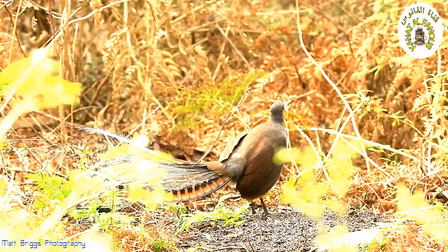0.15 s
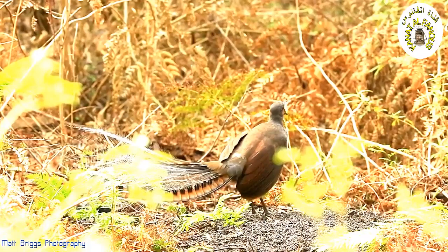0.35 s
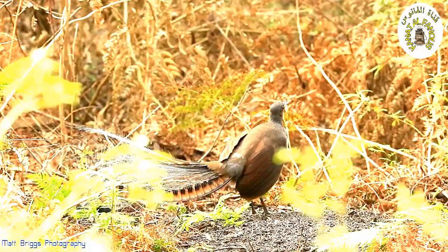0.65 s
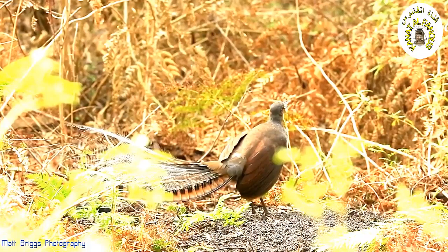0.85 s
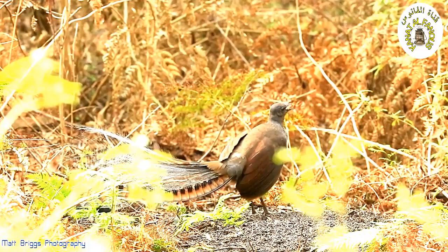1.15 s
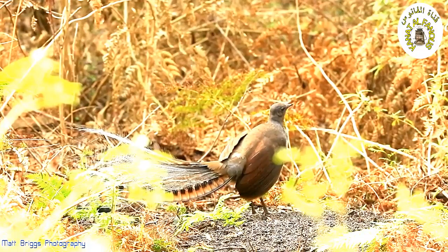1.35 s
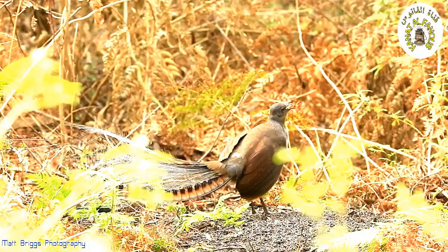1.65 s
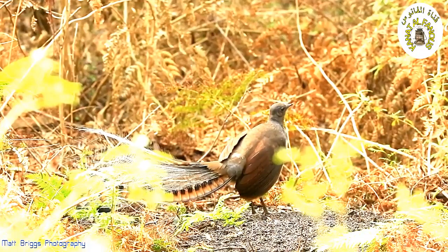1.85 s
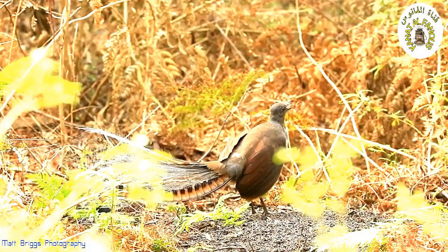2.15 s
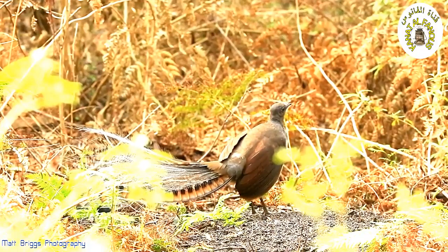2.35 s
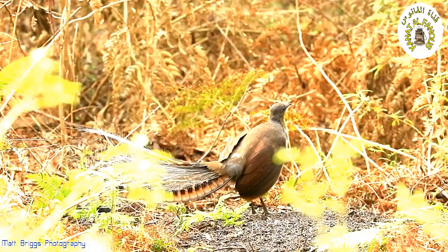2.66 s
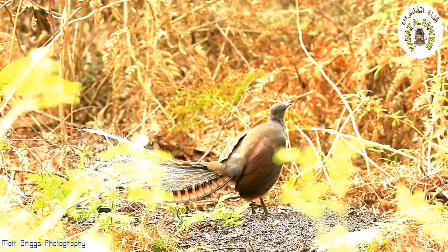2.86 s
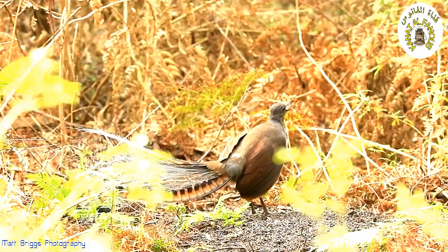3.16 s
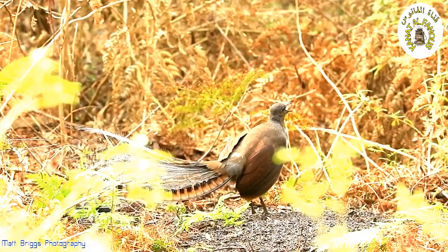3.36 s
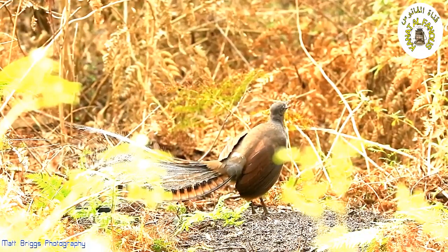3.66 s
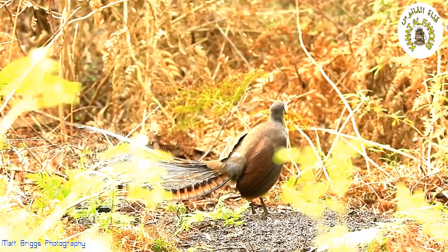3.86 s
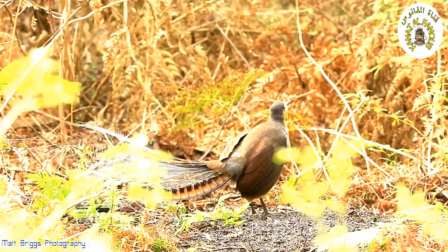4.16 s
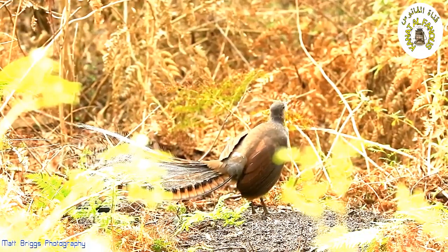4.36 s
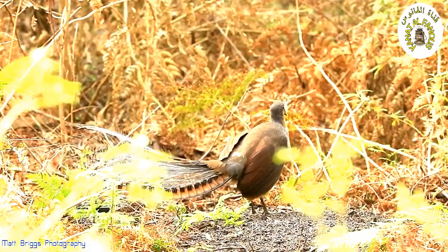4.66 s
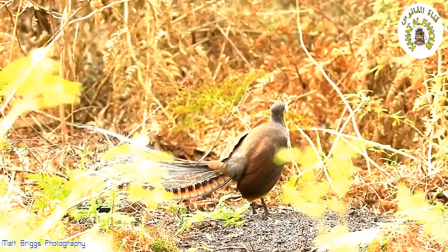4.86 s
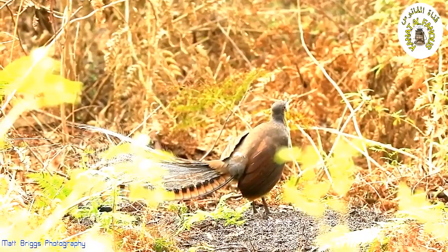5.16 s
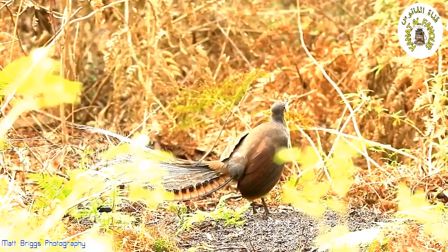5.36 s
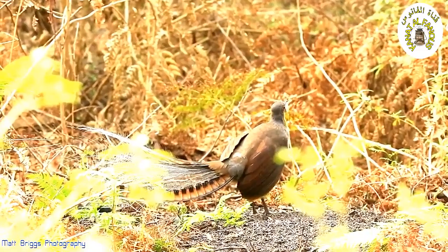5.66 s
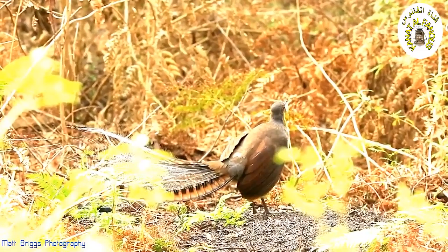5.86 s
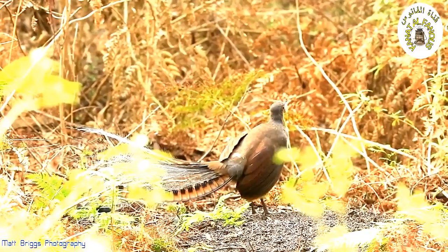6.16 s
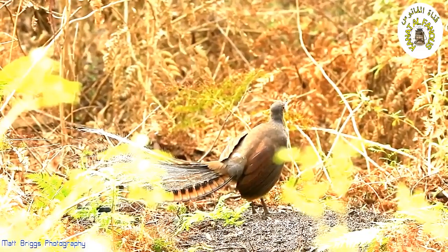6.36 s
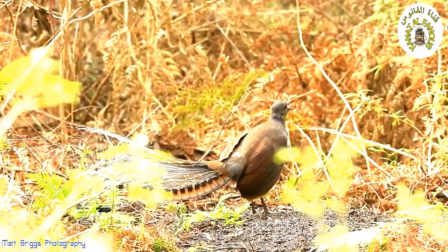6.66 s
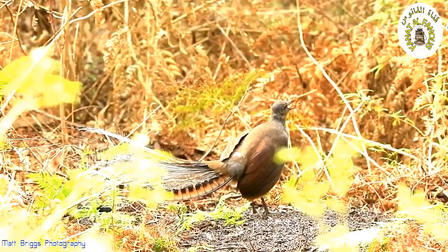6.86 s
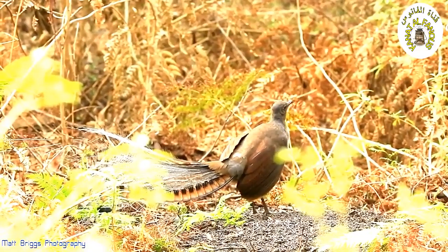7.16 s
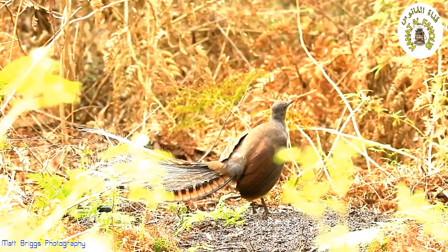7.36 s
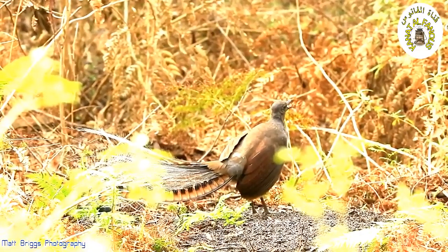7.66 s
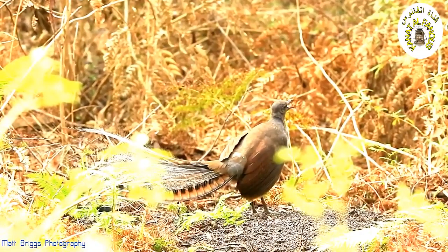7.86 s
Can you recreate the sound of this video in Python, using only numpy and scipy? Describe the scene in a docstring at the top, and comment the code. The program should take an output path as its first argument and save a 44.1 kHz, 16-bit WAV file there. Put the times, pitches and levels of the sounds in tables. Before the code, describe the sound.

Loud, varied birdsong from one near bird, in short bursts with pauses: sweeps, sharp clicks, fluty notes, whoops and a wail, ringing through quiet woodland.

```python
"""A lyrebird sings close by in a forest. It opens with an upsweep, yelps and a gliding arch of a whistle,
then come clicks, flicks, scoops, curling pips and two tumbling runs; flute-like notes, leaping whoops and
a slide follow, then soft steps in the litter and a falling wail. Voices are sums of gliding harmonics,
clicks damped rings under noise. Trunks echo the song as decaying noise; small birds whistle farther off
throughout, dry ferns tick and swish later on, and coloured noise makes the forest's hush."""
import sys
import numpy as np
from scipy import signal
from scipy.fft import rfft, irfft, next_fast_len
from scipy.io import wavfile
from scipy.ndimage import uniform_filter1d, map_coordinates

SR = 44100
rng = np.random.default_rng(int(sys.argv[2]) if len(sys.argv) > 2 else 0)


def store_pcm(level_fs):
    """Save levels as 16-bit WAV."""
    pcm = np.round(np.clip(level_fs, -1, 1) * 32767).astype(np.int16)
    wavfile.write(sys.argv[1], SR, np.atleast_2d(pcm).T)


N = 353241

# Three long notes: a whistled arch, a slide and a falling wail, each before its own gain:
# (time [s], pitch [Hz], level [dB])
ARCH_CURVE = [(0.505, 1515, -35), (0.541, 1692, -9), (0.555, 1724, -12), (0.581, 2496, -15),
              (0.597, 2683, -11), (0.639, 2186, -12), (0.665, 1784, -12), (0.679, 1367, -13),
              (0.695, 892.6, -31), (0.718, 600, -39.5)]
SLIDE_CURVE = [(4.805, 3964, -30.5), (4.813, 3512, -14), (4.825, 3450, -11.5), (4.859, 3398, -10.5),
               (4.907, 2746, -12.5), (4.923, 2485, -13), (4.936, 2000, -25)]
WAIL_CURVE = [(6.754, 1273, -26), (6.764, 1670, -21), (6.776, 1736, -17), (6.8, 1637, -22.5),
              (6.884, 1551, -20.5), (6.928, 1573, -18.5), (7.144, 1407, -15.5), (7.158, 1377, -18.5),
              (7.17, 1360, -31)]
# Single whistles; each drops onto its first pitch, then bends to its last (bend 1 = evenly, more = late):
# (voice, start [s], length [s], drop [Hz], first pitch [Hz], last pitch [Hz], bend [exponent],
#  level [dB], attack [s], release [s])
WHISTLES = [("upsweep", 0.1538, .068, 0, 2910, 5920, 1.09, -28, 0.014, 0.032),
            ("yelp", 0.294, 0.064, 0, 1700, 1025, 1.9, -4.5, 0.0251, 0.022),
            ("yelp", .361, 0.062, 300, 860, 885, 1.2, -26.5, 0.004, 0.01),
            ("flute", 4.027, 0.0874, 3150, 2975, 2830, 1.3, -6.7, .066, 0.016),
            ("flute", 4.103, 0.042, 0, 2870, 2990, 1.05, -5.5, .014, 0.018),
            ("flute", 4.216, .14, 0, 2042, 1968, 1.05, -2.8, .075, .042),
            ("slide", 4.93, .114, 0, 1950, 1000, 6.5, -12, 0.048, 0.02)]
# Whip-like flicks: (time [s], level [dB])
FLICKS = [(0.9478, -21), (1.184, -24.5)]
# Soft U-shaped scoops: (time [s], lowest pitch [Hz], level at mid-note before the throat's swell [dB])
SCOOPS = [(.959, 815.5, -38.5), (1.191, 776, -39)]
# Short pips that curl upward: (time [s], length [s], lowest pitch [Hz], level [dB])
PIPS = [(1.717, 0.025, 1396, -14.5), (2.238, 0.031, 1510, -20)]
# Dipping chirps of two tumbling runs:
# (time [s], length [s], lowest pitch [Hz], swing [Hz], level [dB]), pitches before roughening
CHIRPS = [(1.763, 0.022, 2604, 249, -8.5), (1.784, .012, 2233, 498, -6.5), (1.796, 0.017, 2000, 703, -12.5),
          (2.2842, 0.0091, 2647, 1100, -14.5), (2.2905, .018, 2697, 301, -10),
          (2.3125, .012, 1985, 797, -13.5)]
# The soft downward slur ending each run: (time [s], level before the throat's swell [dB])
SLURS = [(1.811, -23), (2.324, -26)]
# Whoops, a low hoot that leaps to a high note:
# (end of the leap [s], high note's length [s], hoot's last pitch before its settling drop [Hz],
#  hoot level [dB], high note level before the throat's dip [dB])
WHOOPS = [(4.467, 0.073, 728, -19, -3.5), (4.657, 0.062, 878, -21, -4.5)]
# Voice of each kind of note, keyed by name: (2nd harmonic [dB], higher harmonics before slope and bill [dB],
# throat formant [Hz], formant boost [dB], echo send [dB])
VOICES = {"upsweep": (-32, -72, 9000, 0, 3), "flick": (-15.5, -48, 7298, 0, 3),
          "yelp": (-35, -44.5, 11501, 8.5, -1.7), "arch": (-39.5, -47, 12000, 9.5, -1),
          "scoop": (-29, -33, 2798, 3, -2), "pip": (-20, -31, 4570, 10.5, -2),
          "tumble": (-28, -39, 5550, 12.5, 0), "flute": (-44, -45, 11899.5, 7, -1),
          "whoop": (-35, -46, 4400, 12, -2.8), "slide": (-37.5, -49, 10700, 8.5, -0.5),
          "wail": (-35, -33.5, 4600, 7.5, -5)}
# How the throat and open bill pass the higher harmonics: (frequency [Hz], gain [dB])
BILL_RESPONSE = [(4000, -2), (5900, -7), (7300, -5.5), (8500, 0.5), (10000, -2), (12000, 4), (14000, 3.5),
                 (16000, -16)]
# Sharp clicks in the song: (time [s], level [dB], ring pitch [Hz])
CLICKS = [(0.95, -15, 2600), (1.109, -7.5, 1640), (1.14, -11.5, 1740), (1.188, -13.5, 2650),
          (1.354, -8.5, 1700), (1.899, -2, 1500), (3.826, -1, 1550)]
# A small bird's rising whistle: (time from its start [s], pitch [Hz], level relative to the call [dB])
RISE_SHAPE = [(0, 3800, -4.5), (.008, 3980, -4.5), (.03, 4250, -3.5), (.046, 4580, -6.5), (.058, 4650, -19)]
# Each rising whistle: (time [s], level [dB])
RISE_CALLS = [(.325, -39), (1.516, -42.5), (2.01, -38.5), (2.5, -36.5), (3.177, -35.5), (6.673, -39)]
# Another bird's thin chip: (time from its start [s], pitch [Hz], level relative to the call [dB])
CHIP_SHAPE = [(0, 8700, -10), (.012, 7600, 1.5), (.02, 7300, -1.5), (.038, 8260, -23)]
# Each chip: (time [s], level [dB])
CHIP_CALLS = [(0.102, -46), (2.116, -44), (2.405, -50), (2.571, -43), (2.827, -46.5), (3.302, -43),
              (4.277, -47.5), (6.079, -44), (6.312, -46.5), (6.774, -48), (7.3, -51), (7.775, -47.5)]
# Faint calls from deep in the forest: (start [s], length [s], first pitch [Hz], last pitch [Hz], level [dB])
FAR_CALLS = [(2.939, 0.12, 3070, 2350, -53.5), (3.047, 0.035, 5500, 6600, -47.5),
             (3.071, 0.032, 5630, 4250, -53.5), (3.351, 0.069, 6880, 6760, -45),
             (3.509, 0.12, 6410, 6060, -44), (5.937, 0.013, 5930, 6100, -48),
             (5.955, 0.026, 4620, 4000, -48), (6.17, 0.086, 2180, 2086, -54),
             (6.413, 0.12, 2700, 2490, -52.5), (7.816, 0.037, 5580, 6400, -50.5)]
# Soft steps and knocks in the litter: (time [s], thud pitch [Hz], thud level [dB], rustle level [dB])
STEPS = [(6.551, 700, -50, -45), (6.619, 325, -26, -46), (6.683, 224, -29.5, -39.5), (7.617, 490, -27, -51),
         (7.911, 874, -55, -40), (7.945, 895, -56, -43.5)]
# Dry fern stalks tick: (time [s], level [dB])
FERN_TICKS = [(4.966, -30.5), (5.2, -44), (5.472, -40), (5.519, -42.5), (6.509, -45)]
# The dry fronds swish: (time of peak [s], width [s], level [dB])
FERN_SWISHES = [(5.46, 0.081, -66), (5.79, 0.077, -54), (6.661, 0.13, -62), (7.65, 0.16, -55)]
# Noise spectrum of dry fern: (frequency [Hz], relative level [dB per Hz])
FERN_SPECTRUM = [(500, -17.5), (2000, -3), (7000, 3), (11000, -4), (16000, -3.5)]
# Level of the low murmur before its gain: (time [s], level [dB])
MURMUR_LEVEL = [(0, -46.5), (1.6, -48.5), (3.6, -49), (4.3, -46.5), (5.1, -49.5), (6.6, -47.5),
                (7.0, -43.5), (8, -48)]
# Level of the foliage's hiss: (time [s], level [dB])
FOLIAGE_LEVEL = [(0, -49.5), (1.2, -49.5), (1.6, -54), (3.6, -53), (4.6, -48), (6.3, -50), (6.9, -46.5),
                 (8, -52)]
# Noise spectra of murmur and hiss: (frequency [Hz], relative level [dB per Hz])
MURMUR_SPECTRUM = [(15, -57.5), (25, -25), (70, -9.5), (123, -10.5), (227, -4.5), (278, -4.5), (319, -2.5),
                   (428, -6.5), (455, -6.5), (531, -7.5), (601, 0.5), (701, -6.5), (769, -12), (1000, -25),
                   (1300, -36.5), (2200, -120)]
FOLIAGE_SPECTRUM = [(500, -36.5), (900, -3.5), (1500, -1), (2500, -8), (4000, -12.5), (6000, -14.5),
                    (8000, -15.5), (10000, -20.5), (15500, -27.5)]
# Decay of the trees' main echo: (frequency [Hz], time to fall 60 dB [s])
TREE_DECAY = [(300, .5), (900, 0.55), (1800, 0.92), (3000, 0.75), (5000, 0.62), (8000, 0.56), (14000, 0.31)]

SETTLE_S = .0125  # time constant of a note's drop onto its pitch
THROAT_HZ, THROAT_WIDTH = 1310, 0.14  # resonance that shades some notes (width as a log-pitch ratio)
TOP_HZ = 15750  # upper band limit


def lyrebird(flutter_db=4.0, fall_db=6.5, rasp_rad=0.078, formant_width=0.17):
    """Harmonic synthesis: a nearly pure tone with weak overtones that flutter and cross a throat formant."""
    tones, overtones, to_trees = np.zeros((3, N))
    for voice, notes in song().items():
        second_db, higher_db, formant_hz, formant_db, echo_db = VOICES[voice]
        for note in notes:
            pitch, phase, strength = glide(note, jitter=.0015, shimmer_db=.4, edge_s=.004)
            rough_phase = phase + rasp_rad * wobble(700, len(phase))
            tone = strength * np.sin(phase)
            sheen = np.zeros(len(phase))
            for k in range(2, 10):
                base_db = second_db if k == 2 else higher_db
                # the slope and the bill act on every harmonic above the second
                if k > 2:
                    base_db = base_db + along(BILL_RESPONSE, k * pitch) - fall_db * (k - 4)
                boost_db = formant_db * np.exp(-(np.log(k * pitch / formant_hz) / formant_width) ** 2)
                flicker_db = flutter_db * wobble(60.6, len(phase))
                below_nyquist = k * pitch < SR / 2
                gain = amp(base_db + boost_db + flicker_db) * below_nyquist
                sheen += strength * gain * np.sin(k * rough_phase)
            start = note[0][0]
            add(tones, start, tone)
            add(overtones, start, sheen)
            # overtones beam out of the bill, so more of them comes back off the trees
            add(to_trees, start, amp(echo_db) * (tone + amp(5.5) * sheen))
    return tones + amp(-0.5) * overtones + forest(to_trees, near_db=-9, far_db=-19.5)


def song(arch_db=5, slide_db=6.5, wail_db=3.0):
    """Grouping by timbre: all the lyrebird's notes are gathered by voice."""
    notes = {voice: [] for voice in VOICES}
    for voice, *row in WHISTLES:
        notes[voice].append(whistle(*row))
    curves = [("arch", ARCH_CURVE, arch_db), ("slide", SLIDE_CURVE, slide_db), ("wail", WAIL_CURVE, wail_db)]
    for voice, curve, gain_db in curves:
        notes[voice].append([(s, hz, db + gain_db) for s, hz, db in curve])
    notes["flick"] = [flick(*row) for row in FLICKS]
    notes["scoop"] = [scoop(*row) for row in SCOOPS]
    notes["pip"] = [pip(*row) for row in PIPS]
    notes["tumble"] = [chirp(*row) for row in CHIRPS] + [slur(*row) for row in SLURS]
    notes["whoop"] = [note for row in WHOOPS for note in whoop(*row)]
    return notes


def whistle(s, length, drop_hz, first_hz, last_hz, bend, db, attack, release, throat_db=0):
    """Frequency glide: an exponential drop settles the pitch, and a power law bends it to its end."""
    t = clock(length)
    bent_hz = first_hz + (last_hz - first_hz) * (t / length) ** bend
    hz = bent_hz + drop_hz * np.exp(-t / SETTLE_S)
    return sung(s, t, hz, db, attack, release, throat_db)


def flick(s, db, length=0.0073, first_hz=1750, last_hz=5200):
    """Linear sweep: the pitch rises evenly and very fast."""
    t = clock(length)
    return sung(s, t, first_hz + (last_hz - first_hz) * t / length, db, attack=0.0022, release=0.002)


def scoop(s, low_hz, db, length=0.138, turn_s=.058, octave_s=.059, crescendo_db=14):
    """Parabolic glide: the pitch swings down and up (an octave in octave_s) while the level climbs."""
    t = clock(length)
    hz = low_hz * (1 + ((t - turn_s) / octave_s) ** 2)
    growing_db = db + crescendo_db * (t / length - .5)
    return sung(s, t, hz, growing_db, attack=.03, release=.008, throat_db=13.5)


def pip(s, length, low_hz, db, turn_s=0.0083, octave_s=0.0366):
    """Parabolic glide: a brief note passes its lowest pitch early and curls upward."""
    t = clock(length)
    hz = low_hz * (1 + ((t - turn_s) / octave_s) ** 2)
    return sung(s, t, hz, db, attack=0.009, release=0.0049)


def chirp(s, length, low_hz, swing_hz, db, roughness=.033):
    """Random frequency modulation: a note that dips and comes back up is roughened by pitch jitter."""
    t = clock(length)
    dip_hz = low_hz + swing_hz * (2 * t / length - 1) ** 2
    hz = dip_hz * (1 + roughness * wobble(430, len(t)))
    return sung(s, t, hz, db, attack=0.0035, release=0.0048)


def slur(s, db):
    """Resonant swell: a run's soft ending slides down through the throat's resonance."""
    return whistle(s, length=.074, drop_hz=566, first_hz=1604, last_hz=829, bend=1.05,
                   db=db, attack=.003, release=0.049, throat_db=6)


def whoop(s, length, low_hz, hoot_db, db, hoot_s=.056, leap_s=.013,
          from_hz=1350, to_hz=1820, climb_at=.017, climb_s=0.0049):
    """Register leap: a low hoot sags, leaps upward and climbs a logistic S to a held note."""
    hoot = whistle(s - leap_s - hoot_s, length=hoot_s + 0.005, drop_hz=160, first_hz=930, last_hz=low_hz,
                   bend=4, db=hoot_db, attack=0.028, release=0.011)
    leap = whistle(s - leap_s, length=leap_s, drop_hz=0, first_hz=low_hz, last_hz=1705, bend=1.7,
                   db=db - 7.5, attack=.013, release=.002)
    t = clock(length)
    hz = from_hz + (to_hz - from_hz) / (1 + np.exp((climb_at - t) / climb_s))
    held = sung(s, t, hz, db, attack=.007, release=.028, throat_db=-1.0)
    return [hoot, leap, held]


def sung(s, t, hz, db, attack, release, throat_db=0):
    """Envelope and resonance: (s, Hz, dB) rows of a note, its level shifted near the throat's resonance."""
    gate = np.sin(np.pi / 2 * np.clip(np.minimum(t / attack, (t[-1] - t) / release), 0, 1)) ** 2
    swell_db = throat_db * np.exp(-(np.log(hz / THROAT_HZ) / THROAT_WIDTH) ** 2)
    gate_db = 20 * np.log10(gate + 0.018)
    return np.transpose([s + t, hz, db + swell_db + gate_db])


def glide(note, jitter, shimmer_db, edge_s=0.001995):
    """Phase integration: the syrinx's pitch, phase and strength through a note, with a slight tremble."""
    s, hz, db = np.transpose(note)
    s = np.maximum.accumulate(s)
    t = np.arange(s[0] - edge_s / 2, s[-1] + edge_s / 2, 1 / SR)
    smooth_hz = uniform_filter1d(np.interp(t, s, hz), size=96)
    pitch = smooth_hz * (1 + jitter * wobble(400, len(t)))
    phase = 2 * np.pi * np.cumsum(pitch) / SR
    gate = np.sin(np.pi / 2 * np.clip(np.minimum(t - t[0], t[-1] - t) / edge_s, 0, 1)) ** 2
    level_db = uniform_filter1d(np.interp(t, s, db), size=96) + shimmer_db * wobble(120, len(t))
    return pitch, phase, gate * amp(level_db)


def clicks(ring_t60_s=0.0081, attack_s=0.003, snap_db=-9.5, snap_t60_s=0.011):
    """Damped resonance: each click rings the throat under a bright snap and splashes off the ferns."""
    out, t = np.zeros(N), np.arange(SR // 20) / SR
    for s, db, hz in CLICKS:
        ring = np.sin(2 * np.pi * hz * t) * amp(-60 * t / ring_t60_s)
        colour = [(hz / 5, -12), (hz / 2, 0), (hz, 0), (1.8 * hz, -12),
                  (2.7 * hz, -8), (5 * hz, -24), (9 * hz, -40)]
        snap = noise(colour, len(t)) * amp(snap_db - 60 * t / snap_t60_s)
        onset = 1 - np.exp(-t / attack_s)
        add(out, s, amp(db) * onset * (ring + snap))
    return out + forest(out, near_db=-2.5, far_db=-22.0, near_t60_s=0.2, first_echo_s=0.0023)


def forest(x, near_db, far_db, near_t60_s=0.35, first_echo_s=0.0051, build_up_s=0.033,
           linger_db=-19, linger=3.55):
    """Reverberation by convolution: near trunks and ferns answer fast; deep forest leaves a lingering tail."""
    t = np.arange(2 * SR) / SR
    near = rng.standard_normal(len(t)) * amp(-60 * t / near_t60_s) * (t > first_echo_s)
    hz, age, grains = signal.stft(rng.standard_normal(len(t)), SR, nperseg=256)
    fade_db = -60 * age / along(TREE_DECAY, hz)[:, None]
    # a weaker second decay, linger times slower, holds up the faint end
    fade = amp(fade_db) + amp(linger_db + fade_db / linger)
    far = signal.istft(grains * fade, SR, nperseg=256)[1][:len(t)]
    far = far * (1 - np.exp(-t / build_up_s))
    answer = amp(near_db) * near / np.linalg.norm(near) + amp(far_db) * far / np.linalg.norm(far)
    return signal.fftconvolve(x, answer)[:N]


def small_bird(shape, calls, jitter):
    """Frequency-modulated sine: one call shape is repeated with a tremble."""
    out = np.zeros(N)
    for s, db in calls:
        pitch, phase, strength = glide(shape, jitter=jitter, shimmer_db=4.5)
        add(out, s, amp(db) * strength * np.sin(phase))
    return out


def far_calls(octave_db=-22):
    """Random frequency modulation: a fast, uneven warble roughens thin distant notes."""
    out = np.zeros(N)
    for s, length, first_hz, last_hz, db in FAR_CALLS:
        line = [(s, first_hz, db), (s + length, last_hz, db)]
        pitch, phase, strength = glide(line, jitter=.035, shimmer_db=0.5, edge_s=0.019)
        add(out, s, strength * (np.sin(phase) + amp(octave_db) * np.sin(2 * phase)))
    return out


def steps(thud_t60_s=0.053, rustle_t60_s=0.21, attack_s=0.00086):
    """Impact and friction: a damped thud on the ground and a brief noise rustle of dry leaves."""
    out, t = np.zeros(N), np.arange(SR // 5) / SR
    give = 1 - np.exp(-t / .005)  # the leaves yield softly underfoot
    leaf_spectrum = [(100, -13), (800, -2.5), (3000, -8.5), (15000, -32.0)]  # (Hz, dB per Hz)
    for s, hz, thud_db, rustle_db in STEPS:
        onset = 1 - np.exp(-t / attack_s)
        thud = np.sin(2 * np.pi * hz * t) * amp(thud_db - 60 * t / thud_t60_s) * onset
        leaf_db = rustle_db + 5.2 * wobble(410, len(t)) - 60 * t / rustle_t60_s
        leaves = noise(leaf_spectrum, len(t)) * amp(leaf_db)
        add(out, s, thud + give * leaves)
    return out


def ferns(tick_t60_s=.015, crackle_db=5):
    """Amplitude-modulated noise: dry fronds tick and swish in grainy bursts."""
    t = np.arange(N) / SR
    ticks = sum(amp(db - 60 * np.abs(t - s) / tick_t60_s) * (t > s) for s, db in FERN_TICKS)
    swishes = sum(amp(db) * np.exp(-((t - s) / width) ** 2) for s, width, db in FERN_SWISHES)
    grain = unit(amp(crackle_db * wobble(300, N)))
    return (ticks + swishes * grain) * noise(FERN_SPECTRUM, N)


def hush(low_db=1.0):
    """Filtered noise: a low murmur of distant air lies under a fine, even hiss of foliage."""
    t = np.arange(N) / SR
    sway_db = .6 * wobble(6, N)
    murmur_db = np.interp(t, *np.transpose(MURMUR_LEVEL)) + low_db + sway_db
    murmur = amp(murmur_db) * noise(MURMUR_SPECTRUM, N)
    stir_db = .7 * wobble(9, N)
    hiss_db = np.interp(t, *np.transpose(FOLIAGE_LEVEL)) + stir_db
    return murmur + amp(hiss_db) * noise(FOLIAGE_SPECTRUM, N)


def amp(db):
    """Logarithmic level: decibels to gain."""
    return 10 ** (np.asarray(db) / 20)


def unit(x):
    """Power normalisation: scale to rms 1."""
    return x / np.sqrt(np.mean(x ** 2) + 1e-20)


def along(points, hz):
    """Logarithmic frequency: (Hz, value) points are read on a log axis."""
    f, v = np.transpose(points)
    return np.interp(np.log(hz + 1), np.log(np.abs(f) + 1), v)


def wobble(rate, size):
    """Band-limited fluctuation: a smooth random curve with rate knots a second."""
    knots = rng.standard_normal(int(size * rate / SR) + 4)
    return map_coordinates(knots, [np.arange(size) * rate / SR])


def filtered(x, response):
    """Linear filtering: the spectrum of x times a response of frequency."""
    m = next_fast_len(len(x) + SR // 4)
    return irfft(rfft(x, m) * response(np.fft.rfftfreq(m, 1 / SR)), m)[:len(x)]


def noise(spectrum, size):
    """Spectral shaping: coloured noise of rms 1."""
    return unit(filtered(rng.standard_normal(size), lambda hz: amp(along(spectrum, hz))))


def clock(length):
    """Sampled time: seconds since the start of a note."""
    return np.arange(0, length, 1 / SR)


def add(track, s, sound):
    """Superposition: mix a sound into the track at time s."""
    start = max(round(s * SR), 0)
    track[start:start + len(sound)] += sound[:N - start]


def scene():
    """Direct-to-echo balance: the lyrebird is near and clear; the small birds are half echo."""
    riser = small_bird(RISE_SHAPE, RISE_CALLS, jitter=0.005)
    distant = small_bird(CHIP_SHAPE, CHIP_CALLS, jitter=0.027) + far_calls()
    neighbour = amp(1.5) * riser + forest(riser, near_db=-4.0, far_db=-3.5)
    others = amp(-0.5) * distant + forest(distant, near_db=-3.5, far_db=-7.5)
    return (lyrebird() + clicks() + neighbour + others + steps() + ferns() + hush())[None]


def record(dry, threshold_db=-18, squeeze=0.34, recover_db_per_s=11):
    """Compression: gain falls on loud notes and creeps back; nothing passes above the band limit."""
    power = np.abs(uniform_filter1d(dry[0] ** 2, size=220))
    level_db = 10 * np.log10(power + 1e-12)
    wanted_cut_db = squeeze * np.maximum(level_db - threshold_db, 0)
    # a running maximum on a rising ramp makes each cut recover at a steady rate
    creep_db = recover_db_per_s * np.arange(N) / SR
    cut_db = np.maximum.accumulate(wanted_cut_db + creep_db) - creep_db
    levelled = dry[0] * amp(-uniform_filter1d(cut_db, size=220))
    return filtered(levelled, lambda hz: hz < TOP_HZ)[None]


dry = scene()
out = record(dry)
store_pcm(out)
```